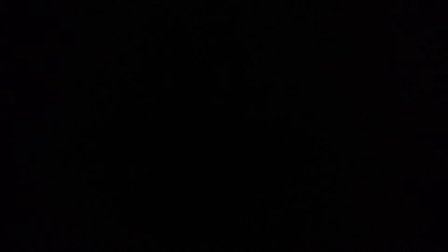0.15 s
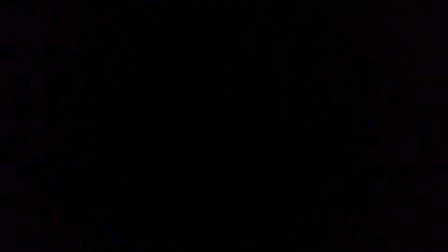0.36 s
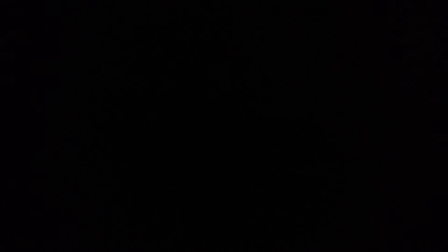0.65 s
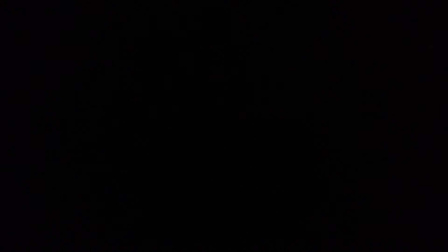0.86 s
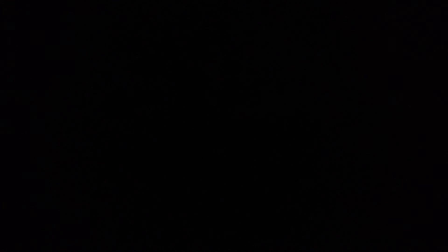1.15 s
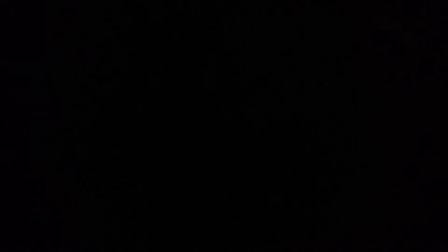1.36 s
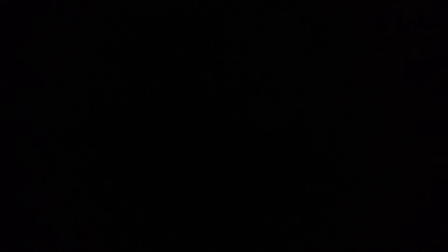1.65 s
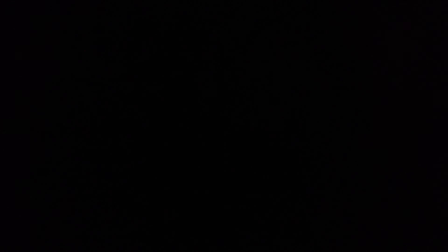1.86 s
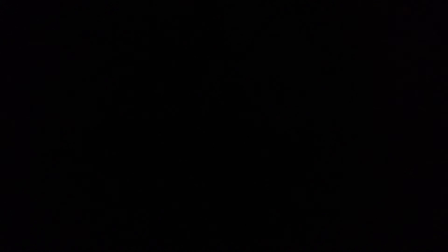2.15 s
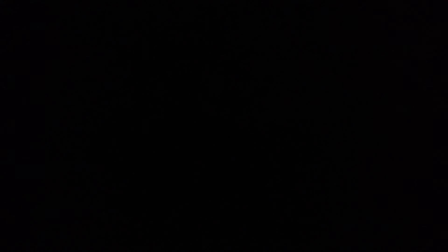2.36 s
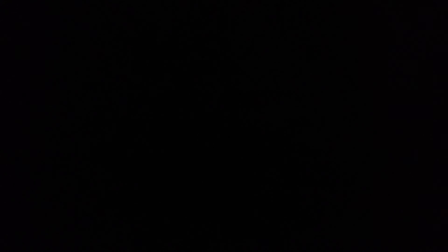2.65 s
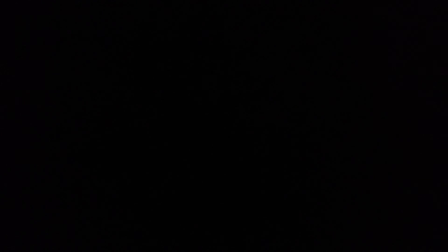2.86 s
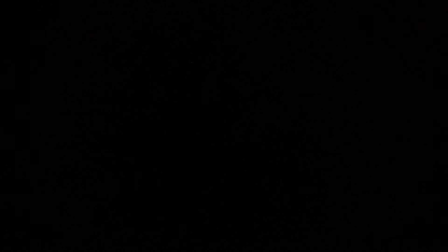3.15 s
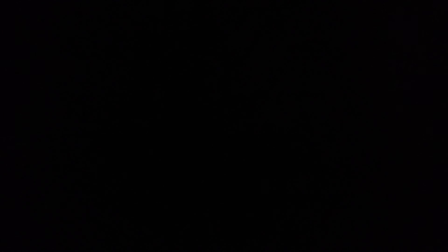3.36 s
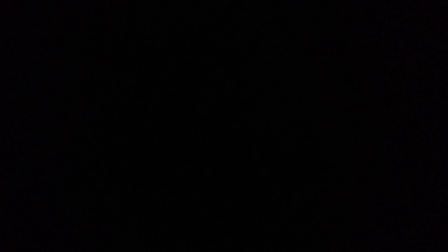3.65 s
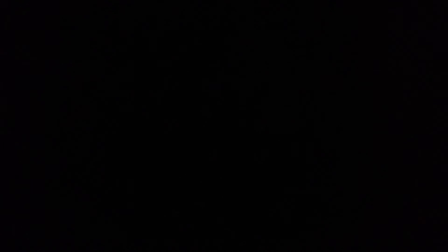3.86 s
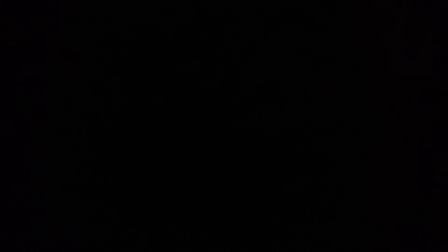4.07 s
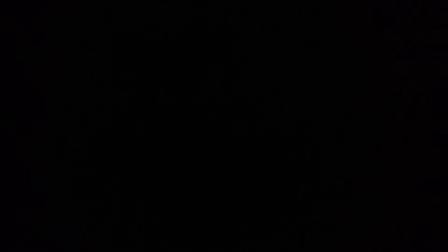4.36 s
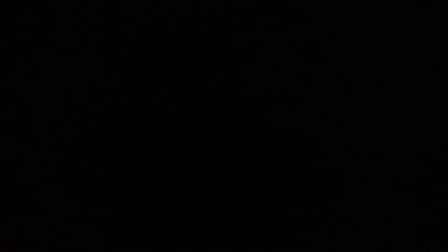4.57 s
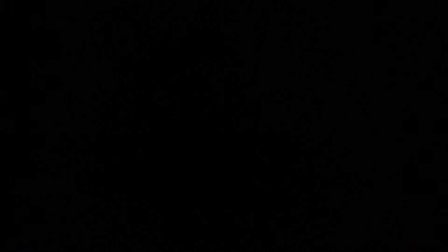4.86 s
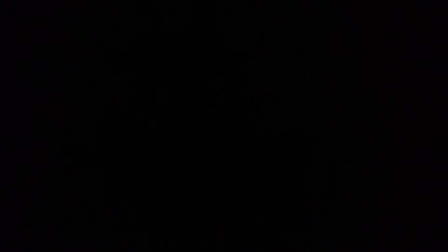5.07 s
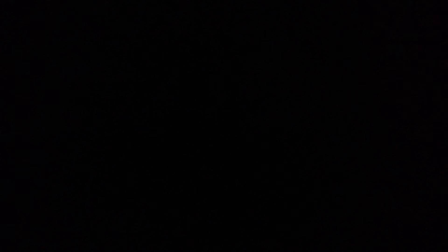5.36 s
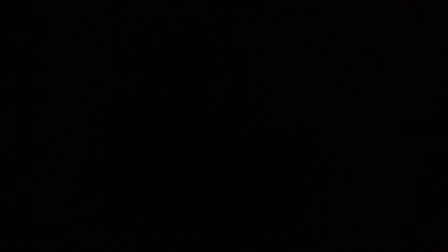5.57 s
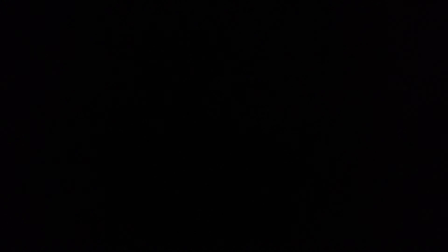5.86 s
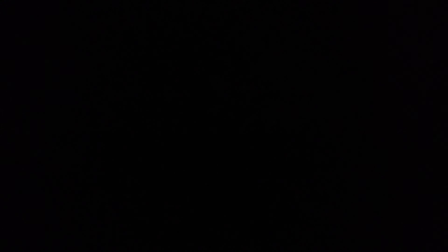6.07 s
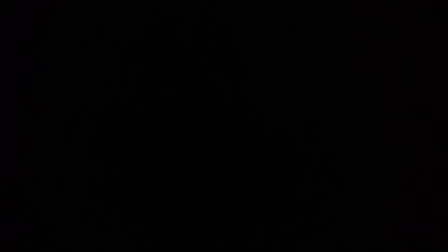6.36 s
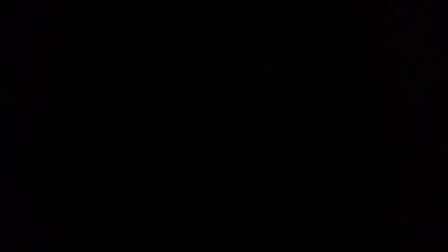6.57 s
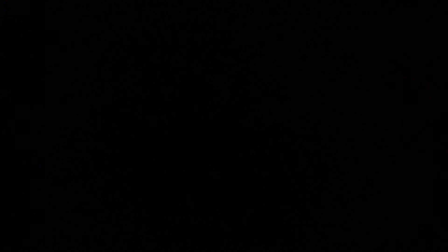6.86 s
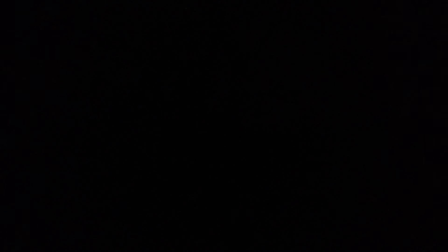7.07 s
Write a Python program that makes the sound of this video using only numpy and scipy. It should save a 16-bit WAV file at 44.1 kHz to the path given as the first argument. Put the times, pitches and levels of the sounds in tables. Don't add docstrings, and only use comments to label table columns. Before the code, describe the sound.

Night crickets trill continuously around a nearby owl, which hoots eight mellow notes in one phrase, then falls silent above faint distant traffic.

```python
import sys
import numpy as np
from scipy import signal
from scipy.fft import rfft, irfft, next_fast_len
from scipy.io import wavfile
from scipy.ndimage import uniform_filter1d

SR = 44100
rng = np.random.default_rng(int(sys.argv[2]) if len(sys.argv) > 2 else 0)


def generate_wav(sig):
    pcm = np.round(np.clip(np.atleast_2d(sig).T, -1, 1) * 32767).astype(np.int16)
    wavfile.write(sys.argv[1], SR, pcm)


def convert_level_to_amplitude(level_db):
    exponent = np.asarray(level_db, float) / 20
    return 10 ** exponent


N = 317685


def rms_one(x):
    return x / np.sqrt(np.mean(x ** 2) + 1e-20)


def coloured(spectrum):
    size = next_fast_len(N)
    hz, level_db = np.transpose(spectrum)
    log_hz = np.log(np.fft.rfftfreq(size, 1 / SR) + 1)
    gain = convert_level_to_amplitude(np.interp(log_hz, np.log(hz), level_db, left=-120, right=-120))
    return rms_one(irfft(rfft(rng.standard_normal(size)) * gain, size)[:N])


def drift(rate_hz):
    pole = np.exp(-80 * np.pi * rate_hz / SR)
    noise = rng.standard_normal(N // 40 + 2002)
    slow = signal.lfilter([1], [1, -2 * pole, pole * pole], noise)[2000:]
    return np.interp(np.arange(N) / 40, np.arange(len(slow)), rms_one(slow))


def envelope(points):
    return np.interp(np.arange(N) / SR, *np.transpose(points))


def owl():
    # (loudest [s], swell [s], release [s], level [dB], pitch [Hz])
    short_notes = [
        (2.296, .032, 0.014, -49, 573),
        (2.455, .147, 0.079, -27.5, 568.6),
        (3.696, 0.084, 0.0488, -36, 563.8),
        (4.605, 0.092, .07, -31.5, 575.7),
    ]
    # (time [s], pitch [Hz], level [dB])
    shaped_notes = [
        [(2.05, 551, -70), (2.092, 554, -41), (2.115, 541, -41), (2.155, 521, -54), (2.25, 557, -65.5)],
        [(2.61, 591, -70), (2.63, 592, -50), (2.643, 598, -60.5), (2.667, 592, -43), (2.715, 586, -33),
         (2.785, 580, -33), (2.812, 559.5, -31.5), (2.849, 570, -63)],
        [(2.888, 695, -79), (2.903, 734, -45.5), (2.922, 758, -29), (2.96, 794.5, -24), (3.038, 766, -27.5),
         (3.15, 737.5, -28.5), (3.293, 666, -32), (3.385, 580.4, -40), (3.426, 544, -62)],
        [(3.84, 677, -70), (3.862, 730, -41.5), (3.93, 773, -25.5), (4.018, 784, -25), (4.062, 768, -33),
         (4.172, 718, -33.5), (4.254, 651, -35), (4.335, 578, -41.5), (4.39, 576, -69)],
        [(4.755, 637, -68), (4.792, 745, -41.5), (4.831, 789, -27), (4.92, 791, -29.5), (5.011, 777, -29.5),
         (5.036, 755, -30.5), (5.09, 715, -34), (5.235, 588.6, -41), (5.28, 560, -71)],
    ]
    # (delay [s], level [dB])
    tree_echoes = [(.021, -36.5), (.047, -31.5), (.09, -45)]
    hoots = [short_hoot(*row) for row in short_notes] + shaped_notes
    hoots.sort(key=lambda hoot: hoot[0][0])
    voice, loudness = owl_voice(hoots)
    direct = voice + chest_air(loudness)
    return direct + sum(convert_level_to_amplitude(db) * np.roll(direct, round(lag * SR)) for lag, db in tree_echoes)


def short_hoot(loudest, swell, release, level_db, hz, count=60):
    top_rounding = 1.2
    slide_hz_per_s, sag_hz = 37, 31.95
    s = np.linspace(loudest - swell, loudest + release, count)
    swelled = ((s - s[0]) / swell).clip(0, 1)
    rise = (np.sin(top_rounding * swelled) / np.sin(top_rounding)) ** 1.63
    spent = ((s - loudest) / release).clip(0, 1)
    fall = np.cos(np.pi / 2 * spent ** 1.43) ** 2
    pitch = hz - slide_hz_per_s * (s - loudest) - sag_hz * spent
    return np.transpose([s, pitch, level_db + 20 * np.log10(rise * fall + 1e-3)])


def owl_voice(hoots):
    # (frequency [Hz], level [dB per Hz])
    throat_colour = [(400, -20.5), (550, 1), (680, 6.5), (900, -11.5), (1200, -7.5), (1700, -11),
                     (2100, -14.5), (2800, -26.5)]
    waver_hz, flutter_db, skirt_db, overtone_db, throat_db = 3.2, 1.0, -25, -60, -29.5
    t = np.arange(N) / SR
    s, hz, level_db = np.concatenate(hoots).T
    pitch = uniform_filter1d(np.interp(t, s, hz), size=880)
    strain = convert_level_to_amplitude(np.interp(pitch, [580, 700], [-9, 0]))
    sounding = sum((t >= hoot[0][0]) & (t <= hoot[-1][0]) for hoot in hoots).clip(0, 1)
    loudness = uniform_filter1d(convert_level_to_amplitude(np.interp(t, s, level_db)) * sounding, size=300)

    phase = 2 * np.pi * np.cumsum(pitch + waver_hz * strain * drift(25)) / SR
    flutter = convert_level_to_amplitude(flutter_db * strain ** 2 * drift(43))
    skirt = convert_level_to_amplitude(skirt_db) * strain * uniform_filter1d(drift(140), size=160)
    tone = (flutter + skirt) * np.sin(phase) + convert_level_to_amplitude(overtone_db) * np.sin(2 * phase)
    throat = convert_level_to_amplitude(throat_db) * strain * coloured(throat_colour)
    return loudness * (np.sqrt(2) * tone + throat), loudness


def chest_air(loudness):
    # (frequency [Hz], level [dB per Hz])
    chest_colour = [(120, -33.5), (200, -6), (260, -1), (350, 4.5), (430, -4.5), (600, -22)]
    # (time [s], level [dB], half-length [s])
    full_rushes = [
        (2.297, -65.5, .04),
        (2.73, -63, 0.052),
        (3.65, -66, 0.03),
        (3.93, -65, 0.035),
        (4.803, -63.5, 0.037),
    ]
    t = np.arange(N) / SR
    steady = loudness.clip(0) ** 0.38 * convert_level_to_amplitude(-58 + 1.5 * drift(2.8))
    rushes = sum(convert_level_to_amplitude(db) * np.exp(-((t - at) / half) ** 2) for at, db, half in full_rushes)
    return (steady + rushes) * coloured(chest_colour)


def crickets():
    # (strokes per second [Hz], first stroke [s])
    near_beats = [(22.14, .027), (21.13, .025), (20.23, .033)]
    # (pitch [Hz], level [dB], share of the cycle sounding [0-1])
    near_tones = [(2435, -65, .55), (2500, -67, .5), (2280, -70, .5)]
    # (frequency [Hz], level [dB per Hz])
    chorus_colour = [(1150, -49), (1950, -25), (2100, -4.5), (2290, -4.5), (2350, 4.5), (2480, 4.5),
                     (2580, 1.5), (2820, -16), (2900, -31.5), (3770, -50.5), (6380, -120)]
    # (time [s], level [dB])
    chorus_swell = [(0.0, -59.5), (1.2, -59.5), (2.4, -59.5), (3.07, -61), (3.55, -57.5), (3.9, -60.5),
                    (4.5, -58.5), (4.95, -61.5), (5.3, -59), (7.2, -60)]
    near = 0
    for (per_s, first_s), (hz, db, share) in zip(near_beats, near_tones):
        near = near + convert_level_to_amplitude(db) * cricket(per_s, first_s, hz, share)

    count = 20
    pitches = np.linspace(2080, 2720, count)
    rates, firsts = rng.uniform(19, 25, count), rng.uniform(0, .04, count)
    strengths = convert_level_to_amplitude(np.interp(pitches, *np.transpose(chorus_colour)))
    crowd = sum(a * cricket(r, f, p, 0.5) for a, r, f, p in zip(strengths, rates, firsts, pitches))
    blur = coloured(chorus_colour)
    return convert_level_to_amplitude(envelope(chorus_swell) + 57.5) * (near + convert_level_to_amplitude(-60.5) * rms_one(crowd) + convert_level_to_amplitude(-61) * blur)


def cricket(per_s, first_s, hz, share, fall=0.028, uneven_db=3.0):
    cycles = (np.arange(N) / SR - first_s) * per_s + 1.5
    stroke = cycles.astype(int)
    within = (cycles - stroke - .5) / share
    start, strength = rng.random(200), rng.standard_normal(200)
    turns = hz / per_s * share * (within - fall * within ** 2 / 2) + start[stroke]
    shape = np.cos(np.pi * within.clip(-.5, .5)) ** 2
    return rms_one(shape * convert_level_to_amplitude(uneven_db * strength[stroke]) * np.sin(2 * np.pi * turns))


def loud_strokes(attack_s=0.0087, release_s=0.009):
    # (time [s], peak level [dB], pitch [Hz])
    bright_strokes = [(0.207, -45, 2490), (0.3386, -54, 2514), (0.6809, -47, 2460), (1.1485, -48, 2350),
                      (1.6546, -49, 2530), (1.9144, -43.5, 2448), (1.9637, -44.5, 2414), (2.385, -53, 2540),
                      (2.595, -47, 2455), (2.8702, -44.5, 2445), (2.914, -47, 2483), (3.005, -44.5, 2393),
                      (3.1368, -50, 2450), (3.2744, -60, 2415), (3.8615, -48.5, 2478), (4.3116, -49, 2510),
                      (4.7163, -48, 2430), (4.8065, -50, 2480), (4.9854, -53.5, 2430), (5.397, -46.5, 2474),
                      (5.441, -45, 2416), (5.6136, -50, 2470), (5.7543, -49, 2430), (6.117, -48, 2470),
                      (6.5121, -58, 2440), (6.561, -54, 2550), (6.609, -45, 2440), (6.7017, -53, 2460),
                      (6.9346, -49.5, 2450)]
    t = np.arange(N) / SR
    out = np.zeros(N)
    for s, db, hz in bright_strokes:
        near = slice(round((s - .02) * SR), round((s + .05) * SR))
        since = t[near] - s - .002
        shape = np.exp(-(since / np.where(since < 0, attack_s, release_s)) ** 2)
        out[near] += convert_level_to_amplitude(db - 2.5) * shape * np.sin(2 * np.pi * hz * t[near])
    return out


def far_traffic():
    # (frequency [Hz], level [dB per Hz])
    road_colour = [(130, -36.5), (220, -11.5), (274, -8), (344, -4.5), (629, -2.5), (783, -2.5),
                   (1050, -5.5), (1130, -7), (1950, -12.5), (2540, -40.5), (4290, -120)]
    # (time [s], level [dB])
    road_swell = [(0.0, -71), (0.7, -70.5), (1.7, -73), (2.6, -71.5), (4.4, -72), (5.4, -72.5),
                  (7.2, -71.5)]
    return convert_level_to_amplitude(envelope(road_swell) + 9.0 + 1.1 * drift(9.2)) * coloured(road_colour)


def breeze():
    # (frequency [Hz], level [dB per Hz])
    stir_colour = [(12, -38), (20, -13.5), (42, -3), (65, 3), (103, 1), (220, -4), (290, -43), (480, -120)]
    # (time [s], level [dB])
    breeze_swell = [(0.0, -78), (0.2, -70.5), (0.7, -70.5), (1.6, -72.5), (3.6, -72.5), (4.35, -70),
                    (5.0, -73), (6.4, -69.5), (7.2, -71.5)]
    # (time [s], peak level [dB], frequency [Hz], half-length [s])
    air_puffs = [(0.322, -56, 104.0, 0.0061), (0.415, -48.5, 89, 0.011), (0.551, -52, 155, 0.0023),
                 (0.627, -60, 91.5, 0.014), (0.688, -52, 90, 0.0069), (0.783, -48.5, 156, 0.0021),
                 (0.929, -59, 98, 0.011), (1.094, -43, 82, 0.0085), (1.572, -45, 71.6, 0.0083),
                 (3.17, -57.5, 82, 0.0083), (3.956, -46.5, 99.0, 0.0057), (4.303, -55.0, 137.0, 0.012),
                 (4.442, -55, 98.0, 0.0047), (6.21, -53, 108, 0.0044), (6.324, -54, 89.0, 0.0058),
                 (6.503, -52.5, 91, 0.016), (6.574, -58, 82.0, 0.006), (6.637, -57, 101, 0.014),
                 (6.835, -52.5, 103.0, 0.0053)]
    t = np.arange(N) / SR
    out = convert_level_to_amplitude(envelope(breeze_swell) + 3.0) * rms_one(convert_level_to_amplitude(2.2 * drift(12.0)) * coloured(stir_colour))
    for s, db, hz, half in air_puffs:
        since = t - s
        out += convert_level_to_amplitude(db) * np.exp(-(since / half) ** 2) * np.cos(2 * np.pi * hz * since)
    return out


def hiss():
    # (frequency [Hz], level [dB per Hz])
    hiss_colour = [(2500, -25), (2900, -5), (3400, -3.5), (4000, -1), (4800, -1), (5300, -6), (7000, -8),
                   (10000, -9), (15300, -10)]
    return convert_level_to_amplitude(-67.5) * coloured(hiss_colour)


def scene():
    mix = owl() + crickets() + loud_strokes() + far_traffic() + breeze() + hiss()
    return mix[None]


def low_pass(x):
    return signal.sosfilt(signal.butter(12, 15300, fs=SR, output="sos"), x)


def record(dry):
    return low_pass(dry)


dry = scene()
out = record(dry)
generate_wav(out)
```